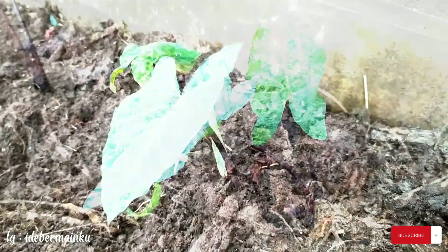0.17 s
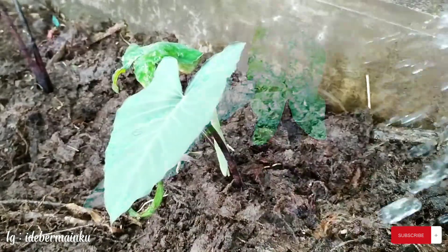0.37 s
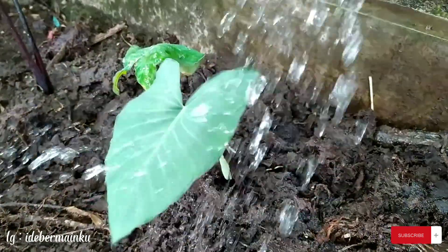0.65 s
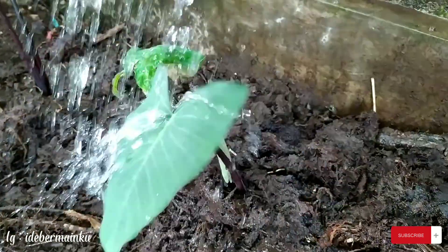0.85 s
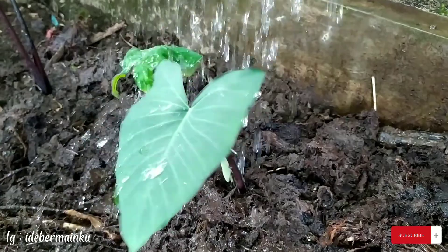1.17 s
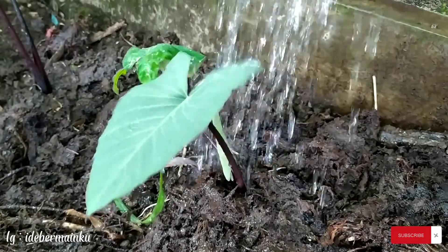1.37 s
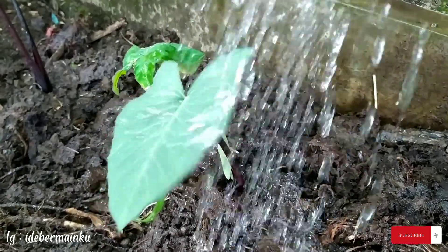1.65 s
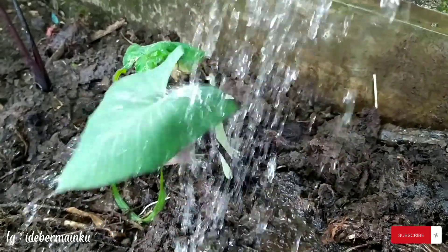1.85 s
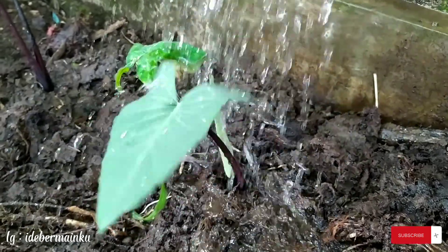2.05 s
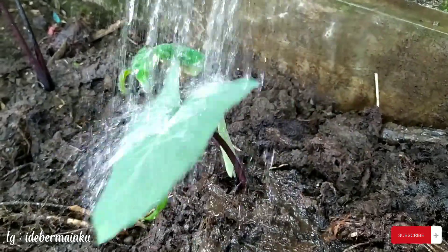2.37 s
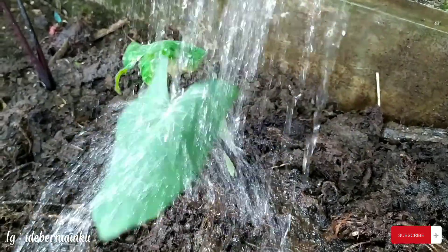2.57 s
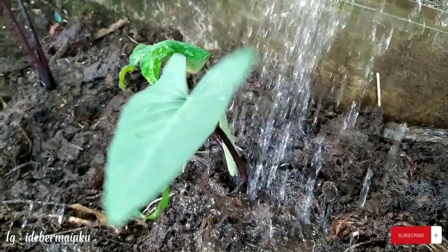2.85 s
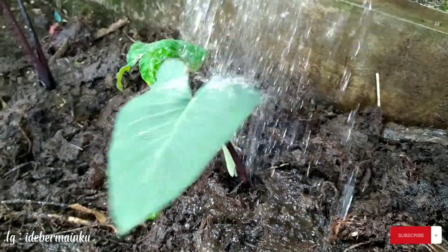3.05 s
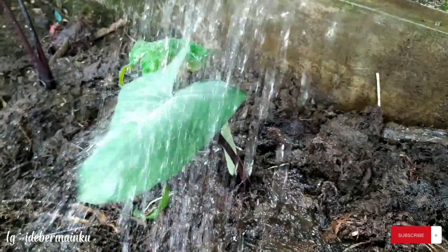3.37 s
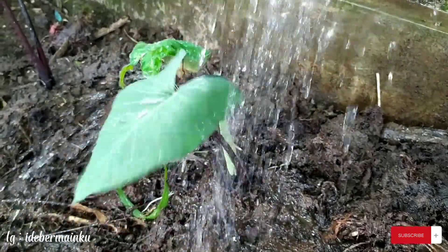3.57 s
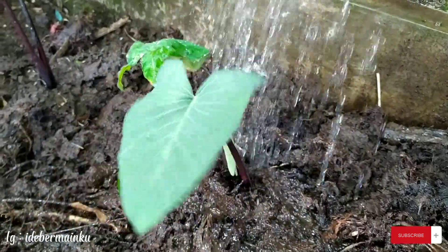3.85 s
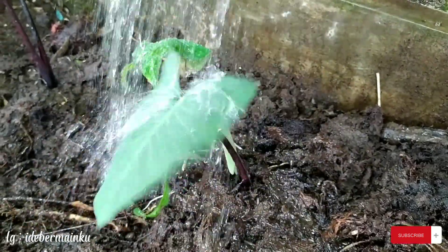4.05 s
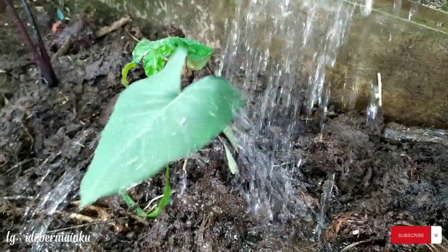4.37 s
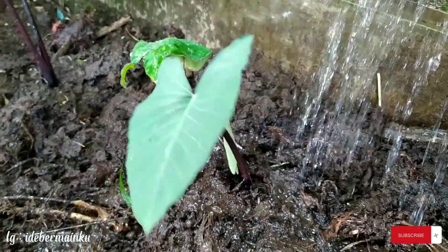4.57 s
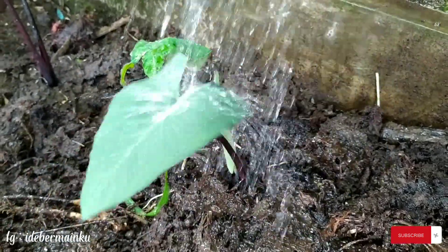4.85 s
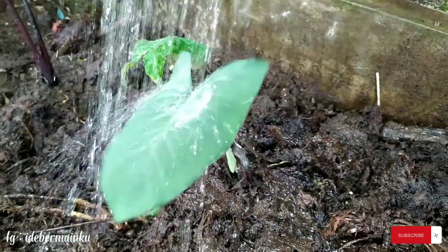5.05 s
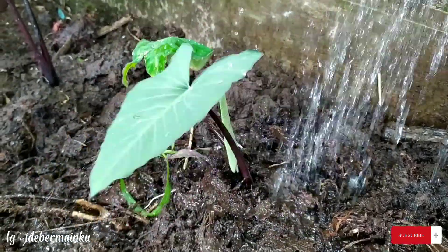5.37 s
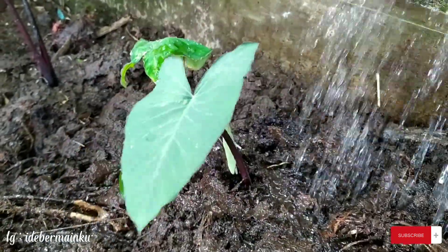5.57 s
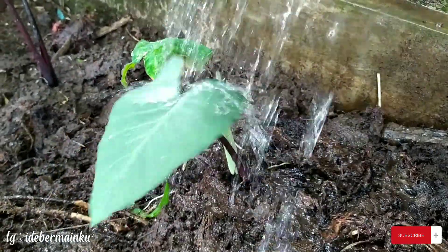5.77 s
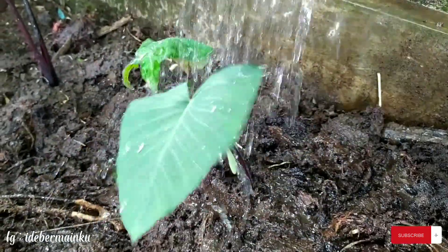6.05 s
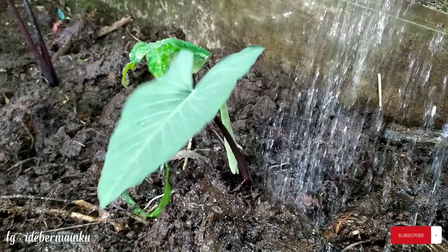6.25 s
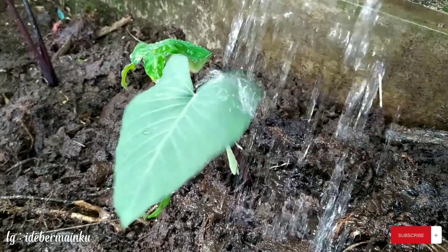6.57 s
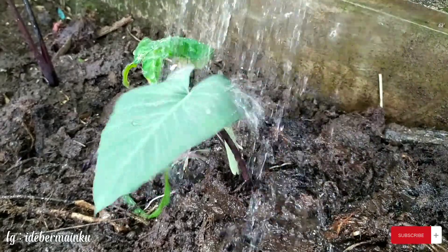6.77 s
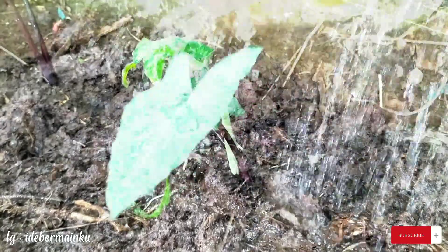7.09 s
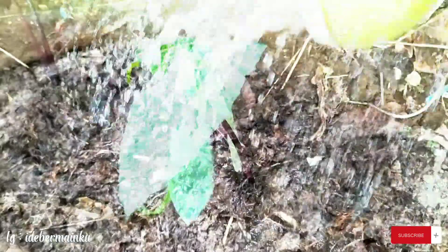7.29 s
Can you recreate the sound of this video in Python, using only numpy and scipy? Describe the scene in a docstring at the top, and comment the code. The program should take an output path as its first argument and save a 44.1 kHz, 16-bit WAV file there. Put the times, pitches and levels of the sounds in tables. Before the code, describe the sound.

A garden bed heard very close, in stereo, outdoors. It opens quietly with faint low rumble and sparse drops, some toward the left. Around 0.3 to 0.4 seconds small gushes and a sharp splat arrive, and from 0.6 the shower settles into a dense, crisp, hissy patter of tiny drops on wet soil. It swells and thins in clumps, fuller around 1.7, 2.3 and 4.4, thinner near 2.1 and 2.6. Fat drops click and splat throughout, with bright bubble plinks near 0.85, 2.2, 4.1 and 5.0. A broad leaf drums dull and low as spray crosses it, notably 1.7-2.0, 2.4-2.8, 3.1-3.6 and 4.1-4.4. Splats crowd together from 5.3 to 5.7. After a slight dip at 6.7, a burst of heavy leaf knocks leads into the loudest, densest pouring, which continues to the end at about 7.4, with low hums stronger beneath.

```python
"""A watering can showers a garden bed close by: a patter of short noise bursts, one for each drop on wet soil.
Fat drops splat as louder bursts, each begun by a click; trapped bubbles and random blips are short sliding tones.
A broad leaf drums in low, dull bursts whenever the spray swings over it.
Clods and a low wall add a brief noisy tail; filtered noise and wavering hums make a faint outdoor rumble."""
import sys
import numpy as np
from scipy import signal
from scipy.fft import rfft, irfft, next_fast_len
from scipy.io import wavfile
from scipy.ndimage import uniform_filter1d

SR = 44100
rng = np.random.default_rng(int(sys.argv[2]) if len(sys.argv) > 2 else 0)


def master_out(mix):
    """Clip the mix to full scale and print it as 16-bit PCM to the path in sys.argv[1]."""
    frames = np.transpose(np.atleast_2d(mix))
    ceiling = np.clip(frames, -1, 1)
    pcm = np.round(ceiling * 32767).astype(np.int16)
    wavfile.write(sys.argv[1], SR, pcm)


N = 327222
TIME = np.arange(N) / SR
GRAIN = 512  # samples in one short sound

# All levels below are taken before the ear balance and the scattered tail are added.
# Flow of the spray on the soil, building up as the can tips. Each row: time in seconds, level in dB.
SHOWER_FLOW = [(0, -63.5), (0.18, -55.5), (0.52, -57), (0.63, -47), (0.8, -50), (1.0, -48.5), (1.35, -46.5),
               (1.85, -46), (2.12, -49.5), (2.33, -44), (2.58, -50.5), (2.8, -45.5), (3.3, -49.5),
               (3.6, -48.5), (4.4, -45.5), (4.7, -47), (5.3, -48), (5.6, -47.5), (6.28, -45.5),
               (6.52, -45.5), (6.7, -51.5), (6.76, -41), (7.1, -40), (7.42, -42)]
# The can slops out a thicker gush. Each row: start in seconds, end in seconds, boost in dB.
GUSHES = [(0.307, 0.333, 7.5), (0.367, 0.388, 17), (0.965, 1.09, 3), (1.398, 1.544, 2.5),
          (1.654, 1.751, 5.5), (1.916, 1.98, 1), (2.932, 3.024, 4), (3.177, 3.2, 4), (3.4, 3.467, 2.5),
          (3.97, 4.005, 2.5), (5.416, 5.507, 5), (6.723, 6.813, 4)]
# Tone colour of the patter on soil. Each row: frequency in Hz, relative level in dB.
SOIL_COLOUR = [(400, -17), (1100, -23.5), (2200, -20.5), (3000, -12), (4000, -13.5), (5000, -7.5),
               (7000, -5.5), (9500, -1.5), (11000, -2.5), (13000, -6), (15500, -9.5)]
# The spray swings onto the leaf and off again. Each row: on in seconds, off in seconds, level in dB,
# swing-in time in seconds, ringing pitch of the blade in Hz.
LEAF_PASSES = [(0.28, 0.354, -71, 0.009, 800), (0.514, 0.675, -56.5, 0.063, 725),
               (0.733, 1.103, -62.5, 0.034, 400), (1.388, 1.46, -59, 0.0089, 413),
               (1.7, 2.002, -57.5, 0.071, 780), (2.37, 2.777, -54.5, 0.053, 820),
               (3.117, 3.632, -54.5, 0.12, 970), (4.104, 4.38, -51.5, 0.098, 840),
               (4.832, 5.3, -60.5, 0.0058, 800), (5.754, 6.1, -61.5, 0.011, 442),
               (6.675, 7.5, -62.5, 0.017, 386)]
# Tone colour of the leaf. Each row: frequency in Hz, relative level in dB.
LEAF_COLOUR = [(100, 1.5), (200, -3.5), (350, -2), (500, -5), (850, -2.5), (1150, -7.5), (1500, -9),
               (2000, -1.5), (2700, -4), (4000, -2), (7000, -1), (15000, -31)]
# Strength of the outdoor rumble. Each row: time in seconds, level in dB.
RUMBLE_LEVEL = [(0, -54.5), (0.22, -53), (0.32, -49.5), (0.39, -55.5), (0.56, -48), (0.7, -55),
                (1.3, -55.5), (2.0, -56), (3.0, -55.5), (3.7, -56.5), (3.85, -61), (4.15, -57.5),
                (5.7, -57.5), (6.45, -56.5), (6.85, -53), (7.42, -53.5)]
# Tone colour of the rumble. Each row: frequency in Hz, relative level in dB.
RUMBLE_COLOUR = [(20, -37), (35, -19), (50, -0.5), (60, 3.5), (76, 1), (88, -0.5), (105, 2.5), (130, -8.5),
                 (180, -11.5), (300, -18), (600, -21), (1200, -32), (4000, -42)]
# Low hums that come and go. Each row: start in seconds, end in seconds, pitch in Hz,
# level in dB before the waver.
HUMS = [(0.027, 0.56, 100.6, -58), (1.427, 2.12, 75.1, -57.5), (2.2, 2.852, 61.2, -63.5),
        (4.283, 4.553, 76.2, -60.5), (5.7, 6.35, 99, -63), (6.0, 6.18, 64, -53), (6.73, 7.078, 97, -53.5),
        (6.796, 7.247, 77, -51.5), (7.28, 7.45, 100, -50)]
# The fattest drops on wet soil. Each row: time in seconds, level in dB, centre in Hz,
# spread in octaves (at least 0.1 is used), left minus right in dB.
SPLATS = [(0.167, -41.5, 8000, 0.33, 15), (0.245, -36.5, 9300, 0.16, 14), (0.3777, -28.5, 8600, 0.45, 9.5),
          (0.3854, -38, 9000, 0.47, 7), (0.443, -33, 9300, 0.45, 5), (0.456, -35, 9400, 0.68, 5),
          (0.4707, -34, 10900, 0.1, 7), (0.536, -37, 9400, 0.13, 14), (0.5514, -35, 10500, 0.25, 6),
          (0.5953, -35.5, 12000, 0.35, -2), (0.618, -36, 8500, 0.4, 0), (0.677, -36.5, 8500, 0.3, 3),
          (0.7008, -34.5, 11100, 0.3, 2), (0.729, -31.5, 9700, 0.28, 2), (0.851, -28.5, 6500, 0.6, 7),
          (0.91, -36, 11400, 0.24, -3), (0.9897, -29.5, 6960, 0.18, 1), (1.0168, -22.5, 11300, 0.16, -1),
          (1.114, -33, 10500, 0.21, 1), (1.1959, -23.5, 9800, 0.36, 1), (1.2088, -30.5, 11100, 0.52, 7),
          (1.283, -32, 8150, 0.38, 3), (1.3637, -32, 9800, 0.26, -2), (1.4358, -29, 7300, 0.29, 4),
          (1.469, -29.5, 9200, 0.17, 8), (1.507, -31, 10700, 0.54, 2), (1.514, -29, 10600, 0.44, 6),
          (1.6072, -31, 8800, 0.45, 6), (1.617, -34, 12200, 0.21, 0), (1.6553, -27.5, 9200, 0.9, 0),
          (1.667, -29, 6500, 0.5, 2), (1.681, -27, 9000, 0.47, 5), (1.6968, -26, 8840, 0.12, 5),
          (1.738, -33, 6000, 0.6, 0), (1.749, -31.5, 5500, 0.79, 0), (1.8219, -25.5, 8700, 0.3, 1),
          (2.233, -34, 5200, 0.31, -4), (2.2886, -34, 7300, 0.4, -6), (2.67, -28, 7160, 0.64, 0),
          (2.7168, -29, 10200, 0.16, 1), (2.78, -47, 9400, 0.17, 2), (2.836, -39, 8500, 0.29, -3),
          (2.947, -35, 8900, 0.13, 8), (3.135, -39, 4800, 0.69, 0), (3.146, -30, 6900, 0.94, 3),
          (3.222, -32, 9800, 0.34, 3), (3.5198, -36, 12000, 0.29, 5), (3.5469, -30.5, 9350, 0.22, 3),
          (3.7336, -28.5, 9600, 0.21, 4), (3.7817, -33, 7400, 0.69, 1), (3.948, -31, 9300, 0.29, 2),
          (4.0763, -23, 7600, 0.55, 2), (4.2225, -24.5, 10800, 0.49, -1), (4.4392, -27.5, 9200, 0.22, 1),
          (4.5634, -28, 7450, 0.18, 1), (4.664, -36, 7440, 0.15, 6), (4.7162, -35, 6500, 0.82, 0),
          (4.7507, -33, 9000, 0.63, 8), (4.802, -33.5, 9000, 0.19, 5), (4.8303, -35.5, 6000, 0.12, 4),
          (4.9655, -26.5, 11600, 0.21, -1), (4.9912, -36, 10100, 0.16, -8), (5.0258, -26.5, 4250, 0.25, -2),
          (5.186, -32, 12200, 0.32, -3), (5.2321, -30.5, 8000, 0.45, 1), (5.258, -27.5, 9800, 0.71, -6),
          (5.2667, -25.5, 4000, 0.84, 2), (5.312, -33, 9050, 0.12, 4), (5.3822, -25.5, 10200, 0.43, 5),
          (5.407, -27, 9900, 0.18, 0), (5.4295, -24.5, 10300, 0.2, 5), (5.4653, -24.4, 9300, 0.45, 3),
          (5.4913, -25, 8100, 0.77, 2), (5.5433, -30, 9500, 0.49, 9), (5.648, -28.5, 9100, 0.4, 1),
          (5.6824, -26, 8900, 0.38, 4), (5.815, -27, 8500, 0.89, 1), (5.8705, -31.2, 11900, 0.24, -2),
          (5.9348, -30, 8000, 0.72, 2), (6.0145, -41, 9500, 0.27, 2), (6.1988, -27.5, 8700, 0.19, 5),
          (6.2054, -27.5, 7500, 0.36, -3), (6.3074, -25, 8800, 0.27, 5), (6.41, -32, 9400, 0.2, 9),
          (6.4323, -23.5, 9500, 0.28, 5), (6.5429, -28.5, 9250, 0.14, -4), (6.555, -32, 11100, 0.15, 1),
          (6.6288, -32.5, 6800, 0.53, 2), (6.745, -24, 8100, 0.22, 5), (6.7623, -20, 9700, 0.09, -2),
          (6.7794, -28, 7600, 0.56, 5), (6.8016, -28, 8300, 0.49, 7), (6.949, -27, 8000, 0.3, 2),
          (7.008, -28, 9500, 0.3, 2), (7.026, -26, 10000, 0.2, 0), (7.152, -28, 9500, 0.3, 3),
          (7.269, -24.5, 10900, 0.13, 3), (7.346, -21.5, 8800, 0.65, 2), (7.3545, -25, 8500, 0.61, -6),
          (7.397, -37, 10300, 0.59, 5)]
# Drops that trap a bubble. Each row: time in seconds, level in dB before the shudder, first pitch in Hz,
# last pitch in Hz, swell time in seconds, level of the opening crack in dB.
BUBBLES = [(0.239, -53, 2050, 2290, .003, -58), (0.276, -50, 1400, 1580, 0.0035, -52),
           (0.296, -53, 720, 960, 0.0045, -60), (0.373, -49, 2510, 2580, 0.0025, -50),
           (0.8476, -31, 3350, 4230, .0004, -23), (0.8486, -24.5, 3870, 6800, 0.00096, -45),
           (1.423, -47, 1520, 1620, 0.0027, -50), (1.434, -46, 3140, 3940, .0014, -45),
           (1.5052, -46, 2500, 3400, .0008, -38), (1.655, -41, 2200, 2900, .001, -35),
           (1.655, -48.5, 1200, 1010, .005, -60), (1.673, -55, 1000, 1080, 0.0043, -60),
           (1.834, -52, 1180, 1260, .003, -60), (2.23, -24, 3480, 7280, .0014, -39),
           (2.586, -37, 4600, 4940, .00091, -45), (3.133, -38, 2310, 4200, .0012, -33),
           (3.792, -39, 3300, 3900, 0.0011, -48), (4.0565, -43, 2800, 3300, .0007, -45),
           (4.0756, -22, 4220, 4720, 0.00066, -28), (4.1115, -35.5, 4300, 4900, 0.00099, -45),
           (4.4585, -42, 3200, 3700, .0008, -48), (4.714, -50.5, 2500, 2620, .004, -37),
           (4.859, -43, 3000, 3400, 0.0011, -48), (5.024, -34.5, 1900, 3170, 0.00092, -35),
           (5.0248, -20, 3280, 6840, .0007, -30), (5.0268, -32, 3020, 5600, .0016, -36),
           (5.266, -32, 2180, 3120, .00065, -30), (5.4272, -33, 3420, 4100, 0.00058, -32),
           (5.464, -34.5, 3000, 3470, 0.00083, -38), (5.491, -43, 2320, 3200, 0.0006, -35),
           (5.578, -43, 3160, 4200, 0.0009, -43), (5.6165, -38, 2070, 2520, .001, -50),
           (6.3055, -41, 3140, 3700, .0008, -42), (6.7778, -36, 2500, 3000, 0.0014, -32),
           (6.8749, -31, 2130, 2580, 0.00074, -36), (7.024, -46.5, 1230, 1500, 0.0068, -55),
           (7.0662, -35, 3100, 4000, .0009, -42)]
# Heavy drops on the leaf. Each row: time in seconds, peak level in dB, centre in Hz, decay in seconds.
LEAF_TAPS = [(0.281, -43, 2100, 0.0044), (0.293, -37.5, 556, 0.0047), (0.35, -43, 750, 0.0029),
             (0.547, -41.5, 520, .005), (0.565, -45, 650, 0.0062), (0.578, -41, 620, 0.0051),
             (0.591, -40, 900, .005), (1.065, -39.5, 1190, 0.0059), (1.423, -40.5, 830, 0.008),
             (1.429, -40, 380, 0.0077), (1.446, -44, 700, .005), (1.654, -41, 1700, 0.003),
             (1.822, -44, 650, 0.0026), (1.907, -40, 850, 0.0036), (2.034, -41.5, 900, 0.0039),
             (2.669, -35, 1000, 0.0023), (3.484, -42, 950, 0.0025), (3.587, -35.5, 900, 0.0027),
             (4.155, -41, 900, 0.0017), (4.716, -58, 1200, .002), (4.91, -43, 866, 0.0027),
             (5.023, -47, 2000, .002), (5.265, -42, 1500, 0.0024), (6.431, -38, 1900, 0.0023),
             (6.729, -38.5, 2000, .005), (6.747, -40, 2400, .005), (6.778, -34, 1500, 0.0065),
             (6.791, -34, 2600, .004), (6.8, -33.5, 1600, 0.0048)]

SPLAT_DECAY_S = 0.00089  # shared by the fat and the middling drops


def undb(db):
    """Turn decibels into a gain."""
    return 10 ** (np.asarray(db) / 20)


def curve(rows):
    """Give the gain at every sample from (seconds, dB) rows."""
    return undb(np.interp(TIME, *np.transpose(rows)))


def unit(x):
    """Scale to an rms (average strength) of 1."""
    return x / np.sqrt(np.mean(x ** 2))


def window(start, end, attack, release):
    """Rise smoothly from 0 to 1 around start, hold, and fall back around end."""
    rising = 1 + np.tanh((TIME - start) / attack / 2)
    falling = 1 - np.tanh((TIME - end) / release / 2)
    return rising * falling / 4


def colour(x, points):
    """Filter by a spectrum of (Hz, dB) points."""
    hz, db = np.transpose(points)
    size = next_fast_len(x.shape[-1])
    f = np.maximum(np.fft.rfftfreq(size, 1 / SR), 1)
    gain = undb(np.interp(np.log(f), np.log(hz), db))
    return irfft(rfft(x, size) * gain, size)[..., :x.shape[-1]]


def flutter(per_s, depth_db):
    """A level that strays at random, with a new target per_s times a second."""
    s = np.arange(0, N / SR + 1, 1 / per_s)
    return curve(np.transpose([s, depth_db * rng.standard_normal(len(s))]))


def place(grains, times, pan_db, lag):
    """Lay (left, right) grains at their times; each lands elsewhere, so one ear gets it up to lag s later."""
    skew = lag * rng.uniform(-1, 1, len(times))
    out = []
    for grain, side in zip(grains, (.5, -.5)):
        first = np.round((times + side * skew) * SR).astype(int)
        at = first[:, None] + np.arange(grain.shape[1])
        at = np.clip(at, 0, N)  # the spare last slot catches what runs past the end
        sound = grain * undb(side * pan_db)[:, None]
        out.append(np.bincount(at.ravel(), sound.ravel(), N + 1)[:N])
    return np.array(out)


def splash(hz, octaves, decay, apart):
    """A brief noise burst in a given band, with a weaker, slower spattering tail."""
    onset, rise, tail_db, tail_decay = .001, .0002, -18, .0036  # s, s, dB, s
    t = np.arange(GRAIN) / SR - onset
    after = np.maximum(t, 0)
    body = np.exp(-after / decay[:, None])
    tail = undb(tail_db) * np.exp(-after / tail_decay)
    envelope = np.maximum(body, tail) * np.exp(np.minimum(t, 0) / rise)
    # noise shared by the ears, plus a part that is opposite in each
    shared, own = rng.standard_normal((len(hz), 2, GRAIN)).transpose(1, 0, 2)
    noise = shared + apart * own * np.array([1, -1])[:, None, None]
    f = np.maximum(np.fft.rfftfreq(GRAIN, 1 / SR), 1)
    distance = np.log2(f / hz[:, None]) / octaves[:, None]
    burst = irfft(rfft(noise * envelope) / (1 + distance ** 2 / 4) ** 2)
    # give each burst the power of its envelope
    wanted, actual = np.mean(envelope ** 2, axis=1), np.mean(burst ** 2, axis=(0, 2))
    return burst * np.sqrt(wanted / actual)[:, None]


def patter(per_s, low_hz, high_hz, octaves, decay, spread_db, pan_db, apart, lag):
    """Drops rain at random times, many small and a few large; rms 1."""
    when, pitch, size, length, side = rng.random((int(per_s * N / SR), 5)).T
    hz = low_hz + (high_hz - low_hz) * pitch
    lengths = decay * 2 ** (2 * length - 1)  # half to double the usual decay
    bursts = splash(hz, np.full(len(when), octaves), lengths, apart)
    db = spread_db * np.minimum(-np.log(size), 4.5)
    return unit(place(bursts * undb(db)[:, None], when * N / SR, pan_db * (2 * side - 1), lag))


def crack(hz, db):
    """A very short click that opens a fat splat or a bubble, peaking at db."""
    decay = .00013  # s
    t = np.arange(GRAIN) / SR
    click = np.sin(2 * np.pi * hz[:, None] * t) * np.exp(-t / decay)
    return click * (undb(db) / abs(click).max(axis=1))[:, None]


def flow():
    """Gain of the water reaching the soil: the pour, boosted by its gushes."""
    edge = 0.0016  # s
    boost_db = sum(db * window(start, end, edge, edge) for start, end, db in GUSHES)
    return curve(SHOWER_FLOW) * undb(boost_db)


def glide(s, db, hz, decay):
    """Short tones that start softly, rise quickly in pitch and die away."""
    t = np.arange(GRAIN) / SR
    attack, glide_s = .0005, .0011
    start, rise = .76, .38  # as shares of hz
    pitch = hz[:, None] * (start + rise * (1 - np.exp(-t / glide_s)))
    envelope = (1 - np.exp(-t / attack)) * np.exp(-t / decay)
    wave = np.sin(2 * np.pi * np.cumsum(pitch, axis=1) / SR)
    tones = wave * envelope / envelope.max() * undb(db)[:, None]
    return place([tones, tones], s, np.zeros(len(s)), lag=.0001)


def gliding_blips(per_s, low_hz, octaves):
    """Short tones at random times and pitches, each gliding upward; rms 1."""
    when, pitch, level = rng.random((int(per_s * N / SR), 3)).T
    return unit(glide(when * N / SR, db=8 * level, hz=low_hz * 2 ** (octaves * pitch), decay=.002))


def wander(x, per_s, depth_db):
    """The spray strays over uneven ground, so each band of the patter swells and sinks on its own."""
    centres = 1400 * 2 ** (np.arange(8) / 2)  # Hz, half an octave apart
    size = next_fast_len(N)
    spectrum, f = rfft(x, size), np.fft.rfftfreq(size, 1 / SR)
    out = 0
    for band in np.eye(len(centres)):
        part = irfft(spectrum * np.interp(f, centres, band), size)[:, :N]
        out = out + part * flutter(per_s, depth_db)
    return out


def soil(pour):
    """Drops tick on the mud, short gliding tones blip, and thrown-up droplets ping and fizz."""
    tick_s = .0008
    drops = patter(per_s=700, low_hz=1010, high_hz=16360, octaves=0.31, decay=tick_s,
                   spread_db=2.0, pan_db=6.0, apart=0.93, lag=.0003)
    droplets = patter(per_s=330, low_hz=6000, high_hz=15000, octaves=0.06, decay=tick_s,
                      spread_db=2.2, pan_db=7.0, apart=0.7, lag=.0003)
    blips = gliding_blips(per_s=59, low_hz=1088, octaves=2.1)
    fizz = rng.standard_normal((2, N))
    layers = drops + undb(-6) * droplets + undb(-13.0) * blips + undb(-3) * fizz
    mix = wander(colour(layers, SOIL_COLOUR), per_s=18, depth_db=2.5)
    mix = mix * flutter(per_s=32, depth_db=1.7)  # the jets break into clumps
    ears_db = np.array([[1.9], [.5]])
    return unit(mix) * pour * undb(ears_db)


def strays(pour):
    """Middling drops stand out of the patter at random, harder when more water flows."""
    per_s, low_hz, high_hz = 26, 6030, 13400
    when, pitch, size, side = rng.random((int(per_s * N / SR), 4)).T
    each = np.ones(len(when))
    hz = low_hz + (high_hz - low_hz) * pitch
    drops = splash(hz, 0.12 * each, decay=SPLAT_DECAY_S * each, apart=0.69)
    drops = drops * undb(2 + 7 * size)[:, None]  # 2 to 9 dB above the flow's gain
    ears_db = np.array([[1], [-1]])
    return place(drops, when * N / SR, -1.5 * (2 * side - 1), lag=.0002) * pour * undb(ears_db)


def leaf():
    """The soft blade damps each blow at once, so spray drums dully; bent on each pass, it rings at that pitch."""
    mist_db = -67.5  # stray spray that always reaches the leaf
    ring_db, ring_octaves, swing_off_s = 5.5, 0.27, 0.034
    drops = patter(per_s=600, low_hz=147, high_hz=2430, octaves=1.0, decay=0.0056,
                   spread_db=0.66, pan_db=6.0, apart=0.23, lag=0.00014)
    drum = unit(colour(drops, LEAF_COLOUR))
    out = drum * undb(mist_db)
    width = 2 ** ring_octaves
    for on, off, db, swing, hz in LEAF_PASSES:
        bent = unit(colour(drum, [(hz / width, 0), (hz, ring_db), (hz * width, 0)]))
        out = out + bent * undb(db) * window(on, off, swing, swing_off_s)
    ears_db = np.array([[-.3], [1.2]])
    return out * undb(ears_db)


def rumble():
    """Low outdoor rumble of filtered noise with its hums, nearly the same at both ears."""
    mid, side = rng.standard_normal((2, N))
    air = np.array([mid + 0.2 * side, mid - 0.27 * side])
    low_noise = unit(colour(air, RUMBLE_COLOUR)) * curve(RUMBLE_LEVEL)
    ears_db = np.array([[1.3], [-.3]])
    return (low_noise + hums()) * undb(ears_db)


def hums():
    """Low, wavering pure tones rise out of the rumble and sink back."""
    edge = .025  # s
    out = 0
    for start, end, hz, db in HUMS:
        tone = unit(np.sin(2 * np.pi * hz * TIME)) * undb(db)
        out = out + tone * window(start, end, edge, edge) * flutter(per_s=12, depth_db=2)
    return out


def splats():
    """Fat drops crack on the soil close by and break up in a noise burst."""
    s, db, hz, octaves, pan_db = np.transpose(SPLATS)
    decay = np.full(len(s), SPLAT_DECAY_S)
    drops = splash(hz, np.maximum(octaves, .1), decay, apart=0.58) * undb(db)[:, None]
    clicks = crack(hz, db + 1.5)
    bursts = place(drops, s - .001, pan_db, lag=.0002)  # each grain starts 1 ms before its onset
    return bursts + place([clicks, clicks], s - .0003, pan_db, lag=.0001)


def bubbles():
    """Drops crack as they punch into a puddle; the pocket of air swells, shudders, slides in pitch and fades."""
    s, db, first_hz, last_hz, swell, crack_db = np.transpose(BUBBLES)
    age = np.arange(2 * GRAIN) / SR / np.maximum(swell, .0002)[:, None]  # counted in swell times
    pitch = first_hz[:, None] + (last_hz - first_hz)[:, None] * np.minimum(age / 2, 1)
    rough = uniform_filter1d(rng.standard_normal(age.shape), int(.0008 * SR))  # noise smoothed over 0.8 ms
    shudder = 1 + .4 * unit(rough)
    envelope = age * np.exp((1 - age ** 2) / 2)  # peaks at 1 after one swell time
    tone = np.sin(2 * np.pi * np.cumsum(pitch, axis=1) / SR)
    rings = tone * envelope * shudder * undb(db)[:, None]
    clicks = crack(np.full(len(s), 7500), crack_db)
    plinks = rings + np.pad(clicks, ((0, 0), (0, GRAIN)))
    return place([plinks, plinks], s, np.zeros(len(s)), lag=.00003)


def taps():
    """Heavy drops knock on the leaf: broad noise bursts with a low centre."""
    s, db, hz, decay = np.transpose(LEAF_TAPS)
    each = np.ones(len(s))
    bursts = splash(hz, octaves=0.93 * each, decay=np.maximum(decay, .001), apart=0.9)
    bursts /= abs(bursts).max(axis=(0, 2))[:, None]
    return place(bursts * undb(db)[:, None], s, 0 * each, lag=0.00015)


def scatter(x):
    """Clods and the low wall return a brief noisy tail, unlike at each ear, changing as the spray wanders."""
    wet_db, decay, first = -8, .007, .0008  # dB, s, s before the tail begins
    size = 4 * GRAIN  # every block of this many samples gets a fresh tail
    t = np.arange(size) / SR
    blocks = np.pad(x, ((0, 0), (0, -N % size))).reshape(2, -1, size)
    tails = rng.standard_normal(blocks.shape) * np.exp(-t / decay) * (t > first)
    tails /= np.sqrt(np.sum(tails ** 2, axis=2, keepdims=True))
    wet = irfft(rfft(blocks, 2 * size) * rfft(tails, 2 * size))
    # the second half of each result spills into the next block
    early, late = wet[..., :size].reshape(2, -1), wet[..., size:].reshape(2, -1)
    spill = np.pad(late, ((0, 0), (size, 0)))
    return x + undb(wet_db) * (early[:, :N] + spill[:, :N])


def scene():
    """All the water, scattered by the garden bed, over the rumble."""
    pour = flow()
    water = soil(pour) + strays(pour) + leaf() + splats() + bubbles() + taps()
    return scatter(water) + rumble()


def record(dry):
    """A steep filter cuts the treble above 15500 Hz."""
    return signal.sosfilt(signal.ellip(10, .2, 80, 15500, fs=SR, output="sos"), dry)


dry = scene()
out = record(dry)
master_out(out)
```